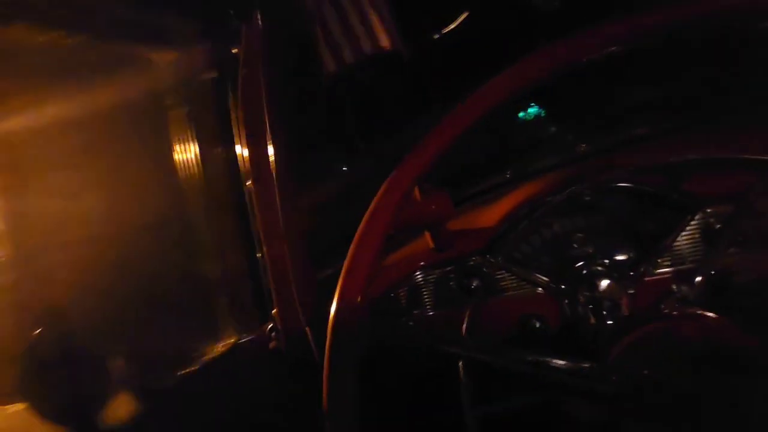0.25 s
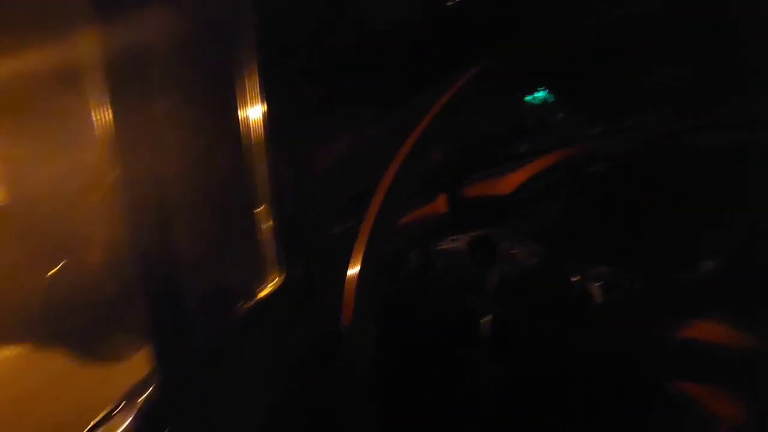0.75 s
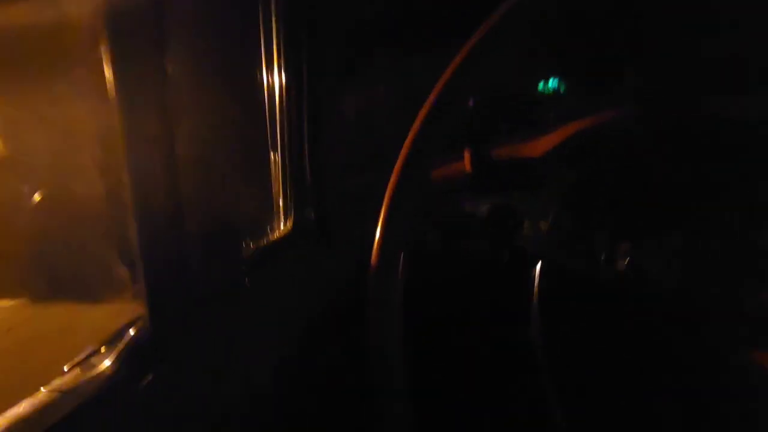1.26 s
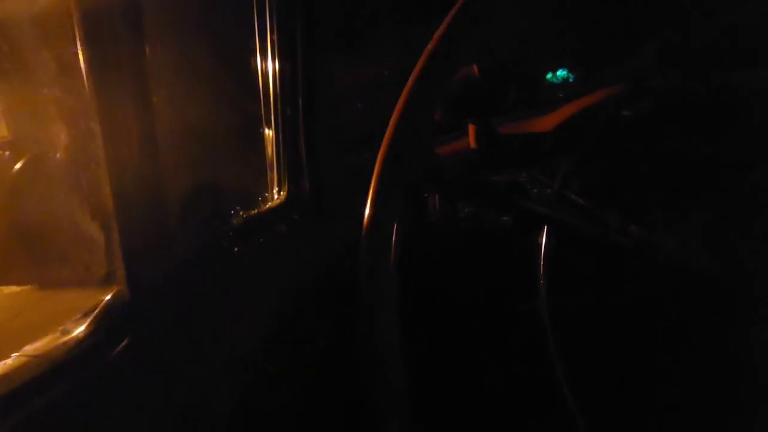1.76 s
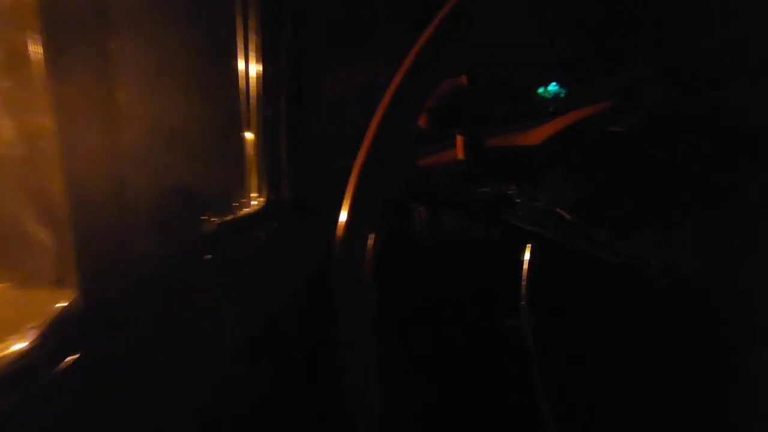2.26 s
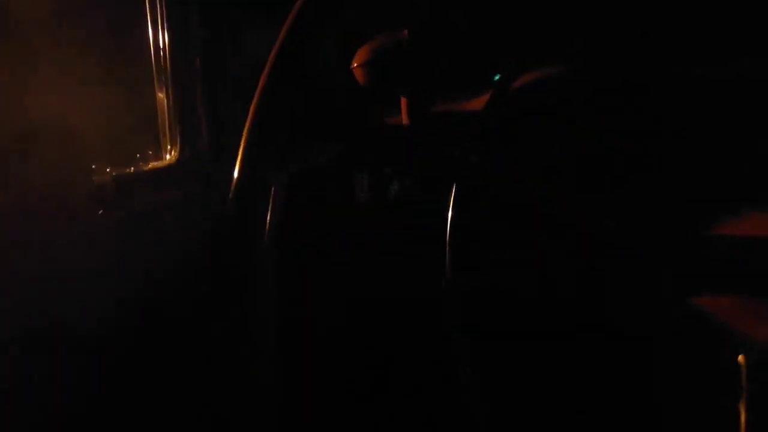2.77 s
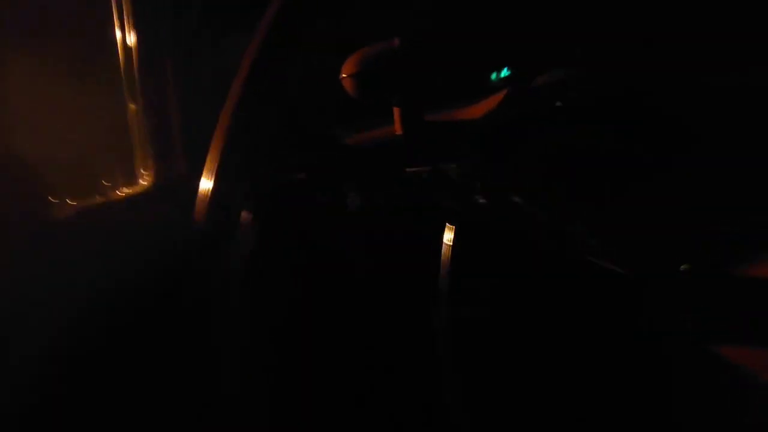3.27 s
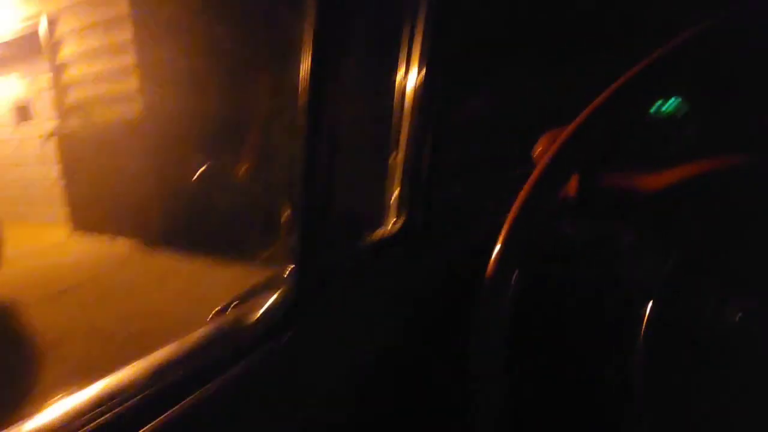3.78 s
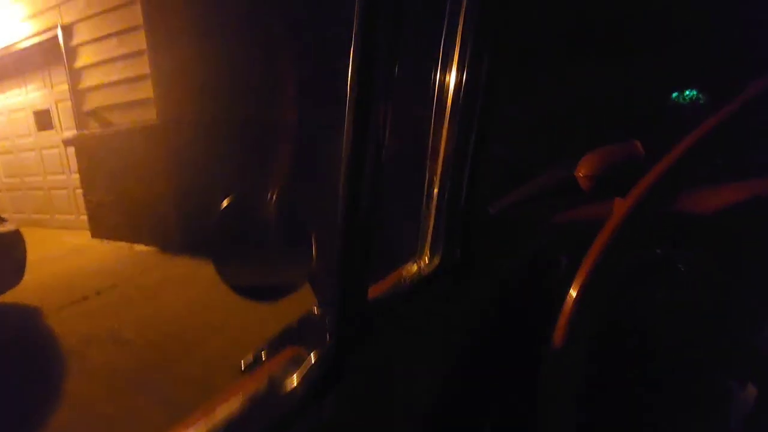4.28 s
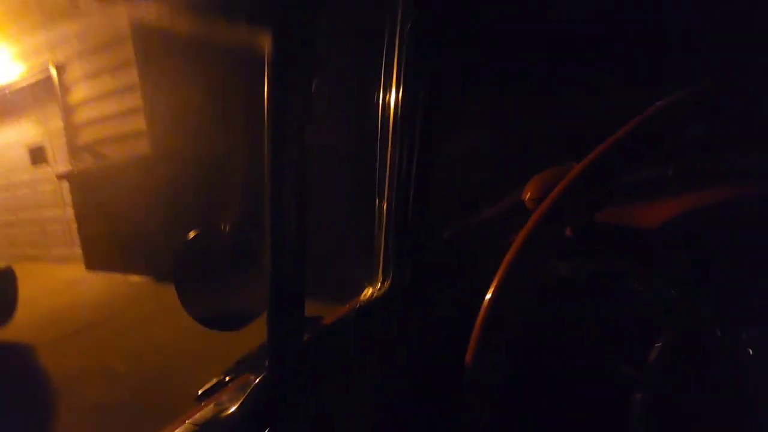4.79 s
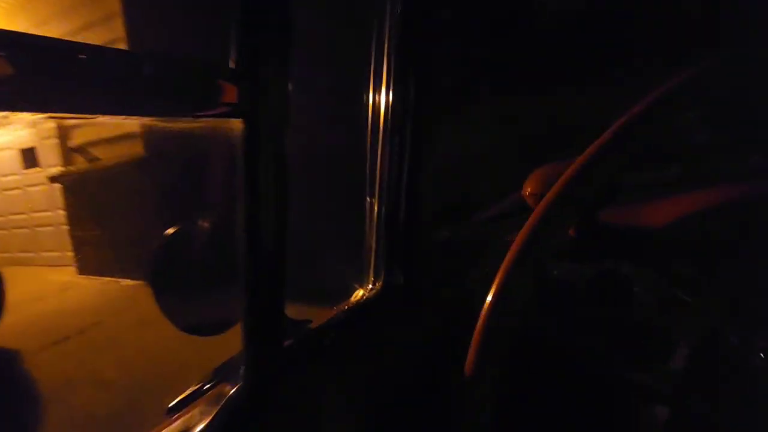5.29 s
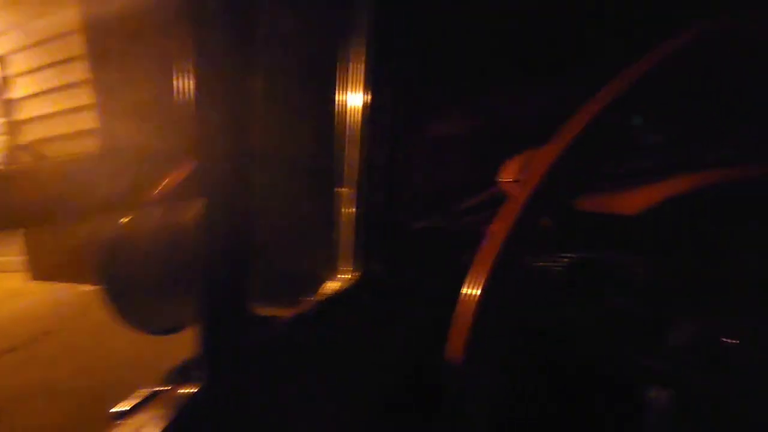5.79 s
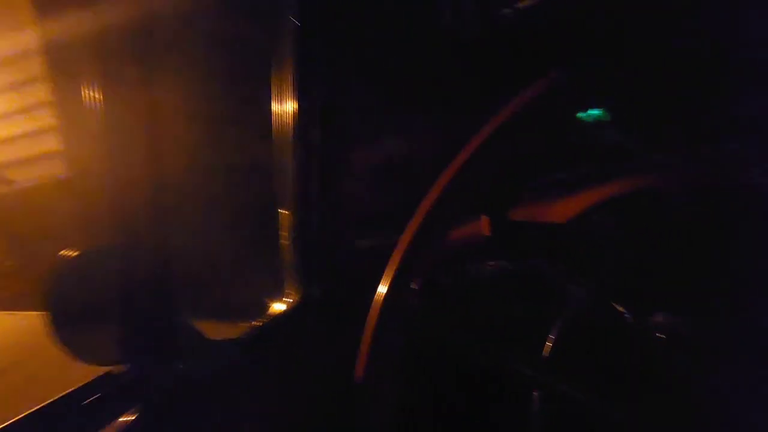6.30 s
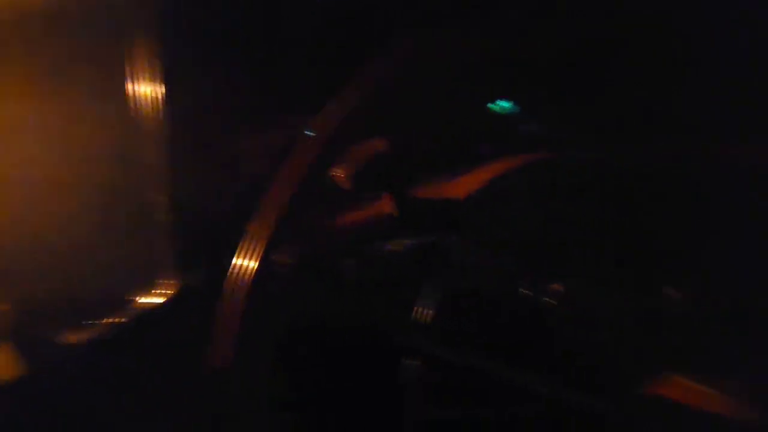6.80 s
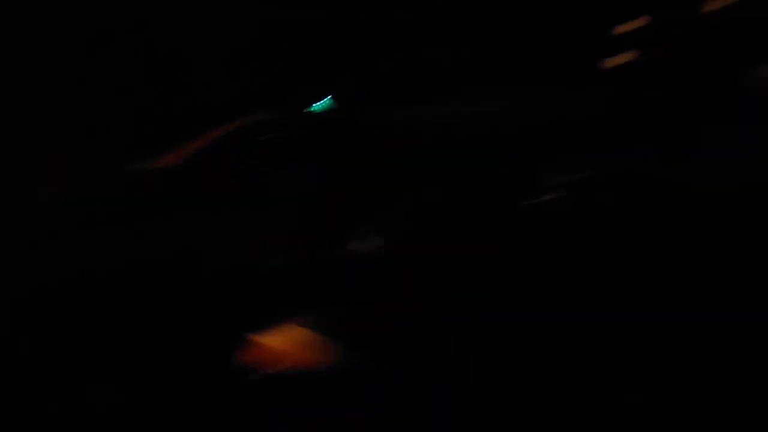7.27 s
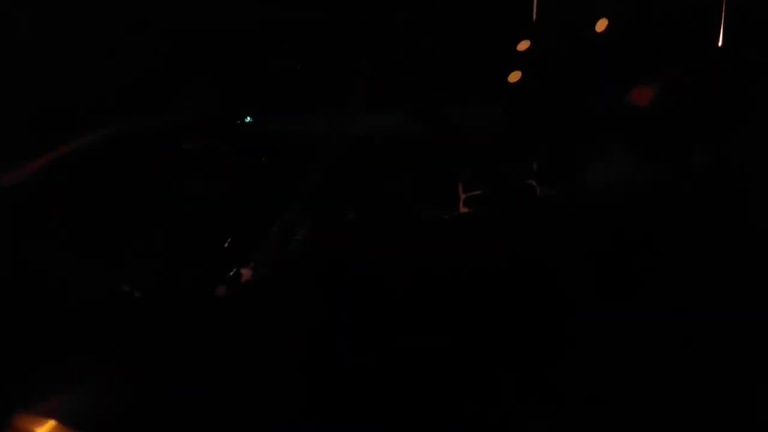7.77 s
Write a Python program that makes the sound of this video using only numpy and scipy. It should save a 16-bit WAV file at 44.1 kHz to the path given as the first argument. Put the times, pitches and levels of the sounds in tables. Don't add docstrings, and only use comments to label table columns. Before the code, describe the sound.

Inside an old car at night, the door bangs shut; after a quiet pause, bumps, creaking window winding, soft thuds and small handling taps.

```python
import sys
import numpy as np
from scipy import signal
from scipy.fft import rfft, irfft, next_fast_len
from scipy.io import wavfile
from scipy.ndimage import uniform_filter1d, map_coordinates

SR = 44100
rng = np.random.default_rng(int(sys.argv[2]) if len(sys.argv) > 2 else 0)


def natural_amplitude(level_db):
    exponent = np.asarray(level_db, float) / 20
    return 10 ** exponent


def waveform_to_disk(signal):
    frames = np.transpose(np.atleast_2d(signal))
    scaled = np.clip(frames, -1, 1) * 32767
    samples = np.round(scaled).astype(np.int16)
    wavfile.write(sys.argv[1], SR, samples)


N = 354563
T = np.arange(N) / SR


def unit(x):
    return x / np.sqrt(np.mean(x ** 2) + 1e-20)


def along(points, hz):
    f, v = np.transpose(points)
    return np.interp(np.log(hz + 1), np.log(f + 1), v)


def curves(rows):
    s, *cols = np.transpose(rows)
    return [np.interp(T, s, c) for c in cols]


def wobble(rate):
    return map_coordinates(rng.standard_normal(int(N * rate / SR) + 4), [T * rate])


def filtered(x, response):
    m = next_fast_len(N + 8192)
    return irfft(rfft(x, m) * response(np.fft.rfftfreq(m, 1 / SR)), m)[..., :N]


def modes(table):
    def response(f):
        total = 0
        for k, (hz, width, db) in enumerate(table):
            total = total + (-1) ** k * natural_amplitude(db) * 1j * f * width / (hz * hz - f * f + 1j * f * width)
        return total
    return response


def coloured(spectrum):
    return lambda f: natural_amplitude(along(spectrum, f))


def rush(response, lag_s, patchy_db=5.0, even_s=.5):
    # frequency in Hz, likeness from 0 to 1.
    alike = [(60, 0.98), (280, 1), (600, .85), (2000, 0.087), (12000, 0.36)]

    def pair(f):
        turn = np.arccos(np.clip(along(alike, f), -1, 1)) / 2
        return response(f) * np.array([np.cos(turn), np.sin(turn)])

    def late(f):
        return np.exp(1j * np.pi * f * lag_s * np.array([[1], [-1]]))

    z = signal.stft(rng.standard_normal((2, N)), nperseg=512)[2]
    patches = uniform_filter1d(rng.standard_normal(z.shape[1:]), size=4, axis=0)
    patches = uniform_filter1d(patches, size=20, axis=1)
    noise = signal.istft(z * natural_amplitude(patchy_db * unit(patches)), nperseg=512)[1][:, :N]
    mid, side = filtered(noise, pair)
    ports = filtered(np.array([mid + side, mid - side]), late)
    width = int(even_s * SR / 2) + 2
    power = uniform_filter1d(uniform_filter1d(ports ** 2, width), width)
    return ports / np.sqrt(np.abs(power) + 1e-20)


def strikes(s, db, t60, rise):
    out = np.zeros(N)
    for start, level_db, decay in zip(s, db, np.clip(t60, .004, 2.5)):
        after = T[:int(2 * decay * SR)]
        blow = natural_amplitude(level_db - 60 * after / decay) * (1 - np.exp(-after / rise))
        part = out[round(start * SR):][:len(after)]
        part += blow[:len(part)]
    return out


def blows(table, part, low_longer, high_longer, high_gain_db, rise, lag_s):
    # frequency in Hz, width in Hz, level in dB.
    door = [(290, 55, 5), (460, 61, 0), (560, 72, -1.5), (940, 450, -6)]
    # frequency in Hz, width in Hz, level in dB.
    bright_metal = [(5700, 920, 1.5), (7400, 1500, 2.5), (12500, 2200, 1.5), (15100, 1800, -5)]
    s, db, low_db, high_db, t60 = np.transpose(table)
    frame = rush(lambda f: modes(door)(f) / (1 + (f / 1300) ** 4), 0.00019, patchy_db=3.5, even_s=0.0086)
    struck = rush(lambda f: modes(part)(f) / (1 + (f / 6500) ** 4), lag_s, patchy_db=-0.5, even_s=.015)
    bright = rush(lambda f: modes(bright_metal)(f) / (1 + (4000 / (f + 1)) ** 4),
                  lag_s, patchy_db=0.5, even_s=.015)
    lean_left, lean_right = natural_amplitude([[1.2], [-1.2]]), natural_amplitude([[-1.2], [1.2]])
    low = strikes(s, db + low_db - 0.5, low_longer * t60, rise=3 * rise) * frame * lean_left
    mid = strikes(s, db - 7.5, t60, rise) * struck * lean_right
    high = strikes(s, db + high_db + high_gain_db, high_longer * t60, rise=1.5 * rise) * bright * lean_left
    return low + mid + high


def door_slam():
    # start in seconds, peak in dB, low part in dB, high part in dB, fall time (60 dB) in seconds.
    slam = [(0.3077, -34.5, -5, -19, 0.029), (0.3506, -32.5, -11, -20, 0.047), (0.38, -15, -10, -28, 0.069),
            (0.4074, -36, -10, -7.5, 0.3), (0.4165, -15, -12, -16, 0.024), (0.4324, 2, -12.5, -16, 0.045),
            (0.4504, -6.5, -12, -7.5, 0.094), (0.4434, -10.5, -12.5, -8, 0.03),
            (0.4624, -15, -8.5, -5, 0.05), (0.4754, -21, -9, -4, 0.065), (0.4894, -19.5, -5.5, -8.5, 0.08),
            (0.5474, -28.5, -3.5, -4.5, 0.09), (0.5714, -49, -3, -5.5, 0.031),
            (0.6004, -31, -11.5, -6.5, 0.084), (0.6134, -39, -8, -7, 0.044), (0.6404, -43, -3, 3, 0.046),
            (0.6514, -37.5, -6.5, -14, 0.083)]
    # frequency in Hz, width in Hz, level in dB.
    latch = [(1030, 680, -5), (1560, 300, -2), (2094, 600, -1.5), (2296, 440, 1), (3920, 1800, -10),
             (5100, 2500, -14)]
    return blows(slam, latch, low_longer=1.8, high_longer=0.94, high_gain_db=0.5, rise=0.00068, lag_s=0.00036)


def knocks():
    # start in seconds, peak in dB, low part in dB, high part in dB, fall time (60 dB) in seconds.
    bumps = [(0.2034, -47.5, 20.5, -6, 0.029), (1.2742, -55, 8.5, -14, 0.057), (2.718, -58, 2, -10.5, 0.16),
             (2.7594, -64, 4, -9.5, 0.09), (2.908, -41, 2, -30, 0.08), (3.095, -67, 8, -20, .2),
             (3.2, -60, 10, -20, 0.17), (3.3108, -32, -2, -12, 0.05), (3.323, -31, 2, -16, .1),
             (3.3825, -40, -6, -25, 0.062), (3.461, -50.5, -6, -25, 0.06), (3.522, -42, 6, -18, 0.05),
             (3.531, -49.5, 7.5, -15, 0.12), (3.5674, -42.5, -12, 1.5, 0.05), (3.634, -26, -16, -22, 0.03),
             (3.647, -30, -8, -20, .04), (3.6636, -15, -16, -19, 0.023), (4.3889, -40, -5, -9, 0.071),
             (4.7606, -53.5, 2, -13, 0.18), (4.9291, -48.5, 12, -8, 0.18), (5.1078, -26, -24, -9.5, 0.06),
             (5.15, -36.5, -15, -18, 0.29), (5.8154, -28.5, 3, -25, 0.15), (5.556, -44, 0, -15, .04),
             (6.1904, -37, 3.5, -13, 0.089), (6.4078, -64, 16, -25, 0.1), (6.5104, -23, -5, -30, 0.039),
             (6.5864, -50, -6, 3, 0.13), (7.2061, -61, 16, 12, 0.12), (7.2424, -46, -3.5, -11, 0.14),
             (7.846, -48.5, 4.5, -10, 0.065)]
    # frequency in Hz, width in Hz, level in dB.
    trim_panel = [(760, 300, 2), (1200, 500, 4), (1650, 700, 5), (2255, 640, 2.5), (2900, 1100, -5.5)]
    return blows(bumps, trim_panel, low_longer=1.4, high_longer=.6, high_gain_db=-4, rise=.002, lag_s=.0003)


def rings():
    # start in seconds, level in dB, frequency in
    # Hz, fall time in seconds.
    short_notes = [(.4166, -10, 5750, 0.022), (.52, -38, 12900, .06), (.436, -7.5, 2086, 0.04),
                   (.44, -26, 480, .08), (.44, -18, 2420, .04), (.436, -20, 850, .06),
                   (.44, -22, 3300, .04), (.45, -35, 940, 0.068), (.548, -39, 12500, 0.12),
                   (.603, -41, 12230, 0.1), (.63, -40, 12300, 0.04), (3.647, -40, 690, 0.047),
                   (3.666, -29, 1030, 0.06), (3.672, -28, 1300, 0.045), (2.91, -44.5, 1300, .04),
                   (5.079, -45, 1310, 0.081), (6.19, -34, 1250, 0.06), (5.655, -46, 2235, .15),
                   (5.76, -44, 2248, .15), (5.812, -27, 2245, .1), (5.855, -35, 2215, .12),
                   (5.81, -42, 3520, .08), (5.995, -41, 2222, .2), (6.509, -33, 950, .04),
                   (6.512, -36, 1350, .04), (5.108, -38, 2050, .08), (4.84, -44, 620, .06),
                   (4.935, -40, 600, .15), (5.03, -42, 610, .1), (5.26, -42, 570, .15),
                   (2.915, -53, 2300, .08), (3.325, -40, 1500, .05), (3.385, -48, 2200, .06)]
    out, t = np.zeros((2, N)), T[:SR // 5]
    shaky = 0.55 * wobble(140) + .5 * np.array([wobble(60), wobble(60)])
    for k, (s, db, hz, t60) in enumerate(short_notes):
        unsteady = shaky[:, k * len(t):][:, :len(t)]
        lag = 2 * np.pi * hz * np.array([[0], [.0001]])
        envelope = natural_amplitude(db - 60 * t / np.clip(t60, .02, .2)) * (1 - np.exp(-t / .002))
        out[:, round(s * SR):][:, :len(t)] += envelope * np.sin(2 * np.pi * hz * t - lag + unsteady)
    return out


def thumps():
    # start in seconds, peak in dB, frequency in Hz, fall time in seconds.
    pushes = [(.385, -23.5, 80, 0.28), (0.434, -5, 175, 0.06), (.44, -14, 48, .2), (1.33, -42, 120, .2),
              (1.87, -52, 290, .12), (2.77, -48, 285, .15), (7.195, -34, 110, .15), (2.53, -55, 330, .1),
              (0.4615, -1, 100, 0.13), (.47, -14, 215, .15), (0.437, -14, 265, .2), (0.487, -9, 166, .3),
              (0.49, -15, 124, .3), (0.525, -16, 52, .3), (0.535, -22, 307, .5), (0.575, -13, 80, .4),
              (.6, -20, 130, .3), (.88, -36, 170, .4), (1.04, -42, 230, .2), (0.655, -22, 125, .6),
              (0.79, -32, 125, .6), (0.835, -30, 32, .3), (2.719, -33, 69, 0.3),
              (2.809, -28.5, 106.5, 0.24), (2.91, -30.5, 120.6, 0.26), (3.307, -24.5, 59.2, 0.25),
              (3.329, -10.5, 104.8, 0.1), (3.639, -20, 75, 0.36), (3.666, -19.5, 167.5, 0.13),
              (4.395, -24, 135.2, 0.45), (4.605, -33, 165, .15), (4.755, -29, 160, .2),
              (4.77, -34, 250, 0.3), (4.797, -27, 160, .2), (4.922, -24, 150, 0.11), (4.97, -32, 200, .2),
              (4.99, -34, 310, .25), (3.322, -27, 330, .12), (5.79, -26, 105, .2), (5.9, -24, 110, .2),
              (5.818, -21, 165, 0.18), (6.407, -18.5, 100.5, 0.12), (6.512, -23, 103.3, 0.24),
              (7.242, -25, 112.6, 0.33), (7.263, -18, 38.4, 0.21), (7.498, -33, 33, 0.7),
              (7.72, -36, 32, .7), (6.42, -36, 380, .15)]
    out, t = np.zeros(N + SR), T[:SR]
    sag = 1 - 0.033 * (1 - np.exp(-t / 0.15))
    for s, db, hz, t60 in pushes:
        envelope = natural_amplitude(db - 2.5 - 60 * t / np.clip(t60, .03, .7)) * (1 - np.exp(-t / 0.0049))
        out[round(s * SR):][:SR] += envelope * np.sin(2 * np.pi * hz * sag * t)
    return out[:N]


def cabin():
    # time in seconds, level in dB.
    stir = [(0, -53.5), (.33, -48), (.9, -44.5), (1.6, -57.5), (2.6, -59), (3.15, -57), (3.5, -41.5),
            (3.8, -44), (4.7, -42), (4.97, -36.5), (5.5, -39.5), (6.3, -37.5), (6.56, -48), (6.85, -59.5),
            (7.15, -52), (7.5, -64), (8.04, -62)]
    # start in seconds, boom in dB, deep part in dB, fall time in seconds.
    shakes = [(0, -25, -20.5, 0.074), (.19, -31.5, -42, 0.24), (0.435, -23, -25, 1.04),
              (0.549, -28.5, -18, 0.31), (0.839, -48.5, -32.5, 0.12), (2.739, -42, -41, 0.42),
              (3.31, -25.5, -37, 0.55), (3.65, -22.5, -43, 0.21), (4.05, -33, -58, 0.45),
              (4.39, -38, -55, 0.3), (5.799, -24, -45, 0.89), (5.97, -54, -40, 0.95),
              (7.231, -35, -32, 0.6), (7.5, -73, -46, 1.5)]
    # frequency in Hz, width in Hz, level in dB.
    suspension = [(33, 4.6, 2.5), (51, 43, 1)]
    # frequency in Hz, width in Hz, level in dB.
    air = [(80, 42, 4), (101.5, 48.7, 6.5), (129.9, 8.2, 8.5), (171, 29, -0.5)]
    # frequency in Hz, width in Hz, level in dB.
    skin = [(264, 73, -5.5), (320, 27, -0.5), (390, 87, -8)]
    stir_db, = curves(stir)
    s, boom_db, deep_db, t60 = np.transpose(shakes)
    jolts = strikes(s, boom_db, t60, rise=0.01)

    seat = natural_amplitude(-56 + .4 * (stir_db + 54.0))
    deep = np.hypot(seat, strikes(s, deep_db, 1.4 * t60, rise=0.037))
    deep = deep * rush(lambda f: modes(suspension)(f) / (1 + (f / 75) ** 2), 0, patchy_db=2.5, even_s=0.042)

    boom = np.hypot(natural_amplitude(stir_db), jolts) * natural_amplitude(0.74 * wobble(21))
    boom = boom * rush(lambda f: modes(air)(f) / (1 + (f / 260) ** 4), 0.00034, patchy_db=-2.5, even_s=0.22)

    rubbing, _ = strokes()
    panel = np.hypot(natural_amplitude(stir_db - 16), natural_amplitude(-23) * jolts + natural_amplitude(-3.5) * rubbing) * natural_amplitude(1.6 * wobble(18.0))
    panel = panel * rush(lambda f: modes(skin)(f) / (1 + (f / 500) ** 4), 0.00032, patchy_db=-0.5, even_s=0.12)
    return deep + boom + panel


def winding():
    # time in seconds, speed in dB, grip of the frame in dB.
    wind = [(3.7, -61.5, -72.5), (4.4, -54, -69), (4.7, -57.5, -67.5), (4.95, -55, -51), (5.12, -57.5, -53),
            (5.4, -58.5, -43.5), (5.75, -59, -43), (6.0, -55.5, -51), (6.13, -57.5, -54), (6.3, -64, -57.5)]
    # time in seconds, extra speed in dB.
    jerks = [(4.45, 1), (4.95, 2.5), (5.13, 4), (5.68, 3), (5.83, 11.5), (6.02, 2), (6.261, 5)]
    jerk_s = 0.048
    speed_db, grip_db = curves(wind)
    jerk_db = sum(db * np.exp(-((T - s) / jerk_s) ** 2) for s, db in jerks)
    moving = np.interp(T, [3.45, 3.78, 6.3, 6.4], [0, 1, 1, 0])
    return speed_db + jerk_db, grip_db, jerk_db, moving


def window():
    # frequency in Hz, width in Hz, level in dB.
    glass = [(588, 55, 1), (780, 73, -10.5), (1100, 44, -10)]
    # frequency in Hz, level in dB per Hz.
    felt = [(8000, -33), (10000, -4), (11500, 4.5), (13000, 3), (15600, 2), (16000, -28), (16400, -50)]
    fizz_db, grip_db, jerk_db, moving = winding()
    slip = wobble(33)
    groan = natural_amplitude(grip_db + 0.77 * jerk_db + 1.5 * slip)
    groan = groan * rush(lambda f: modes(glass)(f) / (1 + (f / 1300) ** 4), 0.00042, even_s=0.21)
    fizz = natural_amplitude(fizz_db - 1.5 + 0.57 * slip)
    fizz = fizz * rush(coloured(felt), 0.000564, patchy_db=-1.0, even_s=0.088)
    return moving * (groan + fizz) + squeaks(jerk_db)


def squeaks(jerk_db):
    # start in seconds, length in seconds, frequency in Hz,
    # glide in Hz, level in dB.
    chatter = [(3.03, .22, 2300, 0, -76), (3.75, .45, 1790, -30, -71), (4.03, .8, 4220, 30, -62),
               (4.2, .57, 2210, 0, -59), (4.22, .9, 3290, 40, -59), (4.18, .95, 5200, 0, -62),
               (4.3, 1.7, 6320, 0, -68), (3.9, 2.3, 7500, 0, -66), (4.7, .76, 2210, 50, -55.5),
               (5.42, .72, 2260, -50, -53), (5.1, .2, 1960, 0, -55), (5.1, .2, 2460, 0, -58),
               (5.33, .62, 3500, 10, -61), (5.55, .58, 2580, -40, -58), (5.55, .58, 2950, 0, -59),
               (5.08, .25, 1400, 0, -59), (5.33, .24, 1090, -30, -58), (4.93, .18, 310, 0, -46),
               (5.5, .3, 600, 0, -49), (5.93, .17, 430, 0, -48), (6.39, .11, 310, 10, -47),
               (6.26, .18, 3320, 0, -67), (6.2, .2, 4200, 0, -70), (6.53, .45, 1760, 0, -73),
               (6.55, .42, 2345, 0, -73), (6.76, .2, 1090, 0, -70), (7.28, .2, 1760, 0, -74),
               (7.7, .3, 2345, 0, -76), (7.3, .5, 1020, 0, -77), (4.74, .16, 620, 0, -54),
               (4.9, .17, 600, 0, -49), (5.15, .2, 570, 0, -51), (2.12, .26, 300, 0, -68),
               (2.22, .22, 600, 0, -76), (7.22, .28, 400, 0, -60), (5.25, .3, 2060, 0, -60),
               (5.93, .2, 3450, 0, -60), (4.58, .12, 520, 0, -56), (4.92, .12, 760, 0, -52)]
    edge_s = .07
    out = np.zeros((2, N))
    for s, length, hz, glide_hz, db in chatter:
        first = round(s * SR)
        t = T[:int(length * SR)]
        span = slice(first, first + len(t))
        blur_hz = 30 + .035 * hz
        knots = rng.standard_normal((4, 1000))
        at = [np.minimum(t * blur_hz, 990)]
        a, b, c, d = (map_coordinates(row, at) for row in knots)
        blur = (0.25 + a + 1j * b) + 0.5 * (c + 1j * d) * np.array([[1], [-1]])
        lag = hz * np.array([[.0005], [0]])
        phase = 2 * np.pi * (hz * t + glide_hz * t * t / (2 * length) - lag)
        edge = np.clip(np.minimum(t, length - t) / edge_s, 0, 1)
        out[:, span] += natural_amplitude(db + jerk_db[span]) * edge * np.real(blur * np.exp(1j * phase))
    return out


def strokes():
    # start in seconds, length in seconds, rustle in dB, hiss over the rustle in dB.
    rubs = [(-.1, .4, -57.5, -12), (0.701, 0.31, -68.5, -9), (0.778, 0.088, -76, 2.5),
            (1.027, 0.14, -73.5, -2), (1.151, 0.28, -76.5, -9), (1.6, 0.79, -84, 3.5),
            (2.029, 0.405, -71.5, -8), (2.533, 0.2, -79, 3.5), (2.702, 0.14, -76.5, 7.5),
            (2.954, 0.72, -68.5, -3), (6.202, 0.743, -64, -1), (6.905, 0.24, -65, 9),
            (7.058, 0.393, -64.5, -2.5), (7.36, 0.605, -78, -10), (7.935, 0.11, -63, -1),
            (8.002, 0.1, -57, -2)]
    s, length, db, hiss_db = np.transpose(rubs)[..., None]
    t = T[::64]
    rise = (t - s) / np.minimum(0.19 * length, .08)
    fall = (s + length - t) / 0.069
    shape = np.clip(np.minimum(rise, fall), 0, 1)
    return [np.interp(T, t, np.sum(natural_amplitude(level_db) * shape, axis=0)) for level_db in (db, db + hiss_db)]


def cloth():
    # frequency in Hz, level in dB per Hz.
    hiss_colour = [(1470, -39.5), (2500, -3.5), (3060, -2), (6400, -6), (7500, -4.5), (8700, -10.5),
                   (10600, -16), (12000, -9), (15300, -11), (16000, -20.5)]
    # frequency in Hz, level in dB per Hz.
    rustle_colour = [(240, -37), (400, -8.5), (509, -8.5), (706, -9.5), (785, -10), (1630, -10),
                     (1820, -12.5), (2080, -11), (4000, -26), (5200, -30.5), (8800, -120)]
    rest_db = -84.5
    speed_db, grip_db, _, moving = winding()
    rubbing, sliding = strokes()
    hissing = natural_amplitude(rest_db) + sliding + moving * natural_amplitude(speed_db + 4)
    rustling = natural_amplitude(rest_db) + rubbing + moving * natural_amplitude(speed_db + 4.5 + 0.43 * (grip_db + 56.5))
    stroke = wobble(14)
    hiss = hissing * natural_amplitude(0.9 * stroke + 1.5 * wobble(150))
    hiss = hiss * rush(coloured(hiss_colour), .0005, patchy_db=-1.0, even_s=.1)
    rustle = rustling * natural_amplitude(0.56 * stroke + 1.9 * wobble(40))
    rustle = rustle * rush(coloured(rustle_colour), .0004, patchy_db=1.5, even_s=0.052)
    return hiss + rustle


def ticks():
    # start in seconds, peak in dB, frequency in Hz, high part in dB, left over right in dB.
    taps = [(1.0196, -33.5, 3900, 9.5, 7.5), (1.0285, -38, 7600, -13.5, 5.5), (1.265, -59, 7400, 3.5, 3),
            (1.37, -66.5, 12200, 7, 3), (3.7792, -17.5, 6166, -7.5, -6), (5.108, -23, 2240, -6, 2),
            (5.556, -33, 2970, -7, 1.5), (7.1312, -25.5, 3940, -3, -11), (7.3787, -37.5, 1000, 2.5, 5),
            (7.7009, -50, 3600, -8, -2), (7.8526, -45, 1300, 2, 8), (7.865, -47, 2200, 2, 8),
            (7.967, -52, 4000, -10, 0), (7.9403, -38, 2270, -9, 18), (7.9762, -39.5, 1900, 8, -3),
            (7.9982, -36, 5500, -57, 7), (8.0015, -16.5, 1910, 2, -7.5), (8.0088, -29.5, 1720, -35, -23)]
    out, t = np.zeros((2, N + 400)), np.arange(400) / SR
    grit = rng.standard_normal((len(taps), 3, 400))
    for (s, db, hz, high_db, pan_db), noise in zip(taps, grit):
        note = np.sin(2 * np.pi * hz * t) * natural_amplitude(-60 * t / 0.0018) * (1 - np.exp(-t / 0.00024))
        shell = 0.2 * np.sin(2 * np.pi * 1900 * t) * natural_amplitude(-60 * t / 0.0032)
        shell = shell + 0.12 * noise[2] * natural_amplitude(-60 * t / 0.013)
        rattle = (1 - np.exp(-t / .0007)) * natural_amplitude(high_db - 60 * t / 0.0045)
        crack = 0.38 * rattle * np.diff(noise[:2], prepend=0)
        pan = natural_amplitude([[pan_db / 2], [-pan_db / 2]])
        out[:, round(s * SR):][:, :400] += natural_amplitude(db + 4.5) * pan * (note + shell + crack)
    return out[:, :N]


def tail(x):
    # frequency in Hz, fall time (60 dB) in seconds.
    trim = [(200, 0.64), (1000, 0.2), (4000, 0.18), (14000, 0.13)]
    hz, t, z = signal.stft(rng.standard_normal((2, SR // 2)), SR, nperseg=256)
    fading = natural_amplitude(-60 * t / along(trim, hz)[:, None])
    echo = signal.istft(z * fading, SR, nperseg=256)[1]
    return signal.fftconvolve(x, echo / np.linalg.norm(echo[0]), axes=1)[:, :N]


def night():
    # frequency in Hz, level in dB per Hz.
    street = [(120, -31), (200, -19), (249, -28), (340, -23.5), (373, -5.5), (401, -32), (465, -43.5),
              (1770, -46.5), (2700, -58), (6600, -47.5), (7500, -37), (8500, -50), (16000, -58.5)]
    # frequency in Hz, level in dB.
    lamp = [(1760, -82.5), (2345, -89.5)]
    heard_db = np.interp(T, [3.4, 3.8, 6.4, 6.6], [-14, 6, 6, 0.0])
    hum = 0
    for hz, db in lamp:
        level = natural_amplitude(db + heard_db + 2.5 * wobble(7.6))
        hum = hum + level * np.sin(2 * np.pi * hz * T + 1.6 * wobble(25))
    return natural_amplitude(-76) * rush(coloured(street), 0, patchy_db=.8) + hum


def scene():
    # frequency in Hz, left over right in dB.
    near = [(60, -0.5), (300, 2.5), (700, 6), (2300, -0.5), (5000, 5.5), (14000, 9)]
    hits = door_slam() + knocks() + rings()
    small = ticks()
    steady = cabin() + cloth() + window()
    steady = filtered(steady, lambda f: natural_amplitude(along(near, f) * np.array([[.5], [-.5]])))
    echo = natural_amplitude(-6) * tail(hits + 0.2 * small)
    return hits + small + echo + thumps() * natural_amplitude([[.6], [-.6]]) + steady + night()


def roll_off(x):
    return signal.sosfilt(signal.butter(12, 16660, fs=SR, output="sos"), x)


def record(dry):
    top_hz = 16200
    soft = dry / (1 + np.abs(dry) ** 8) ** (1 / 8)
    mix = filtered(soft, lambda f: np.interp(f, [top_hz, top_hz + 450], [1, 0]))
    return roll_off(mix)


dry = scene()
out = record(dry)
waveform_to_disk(out)
```